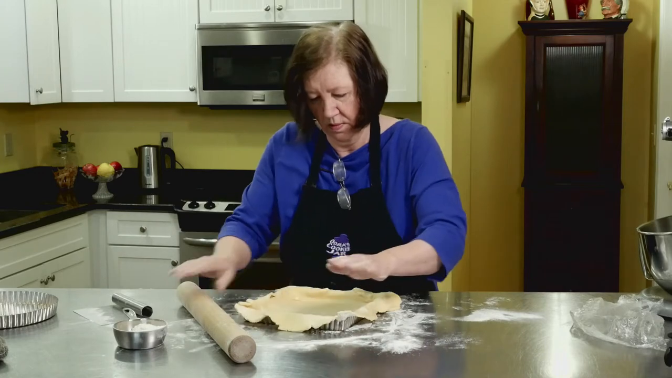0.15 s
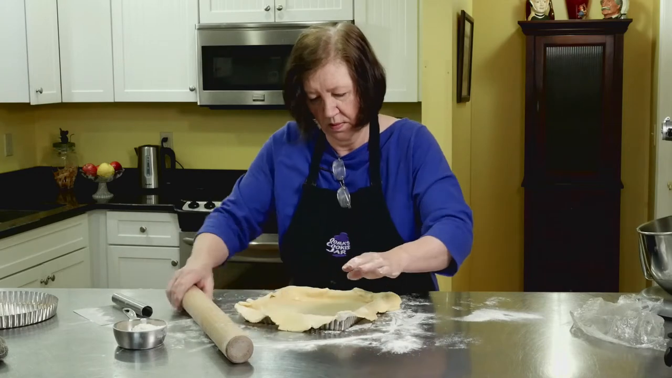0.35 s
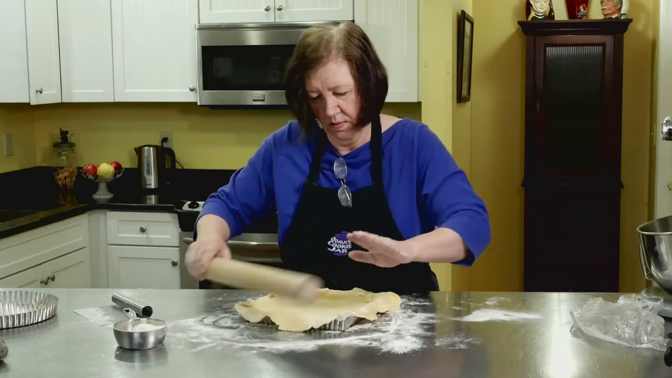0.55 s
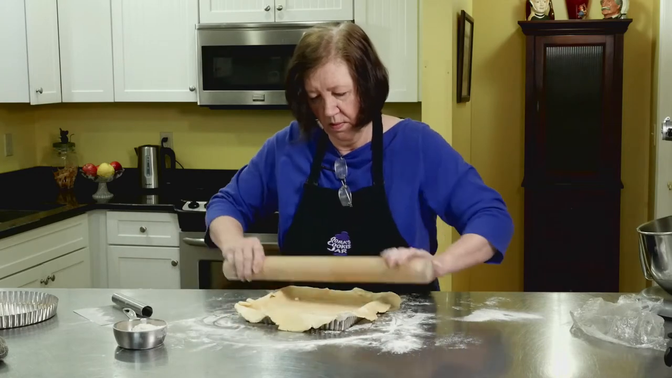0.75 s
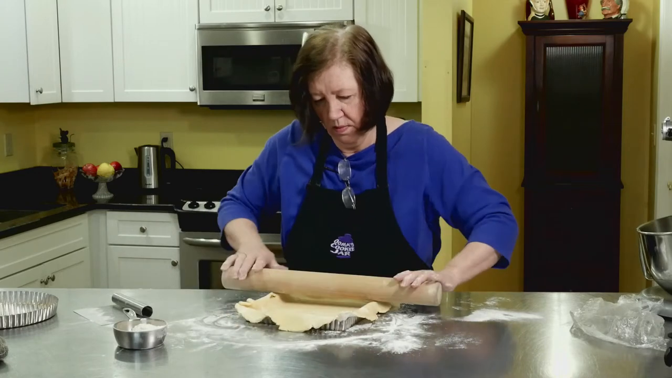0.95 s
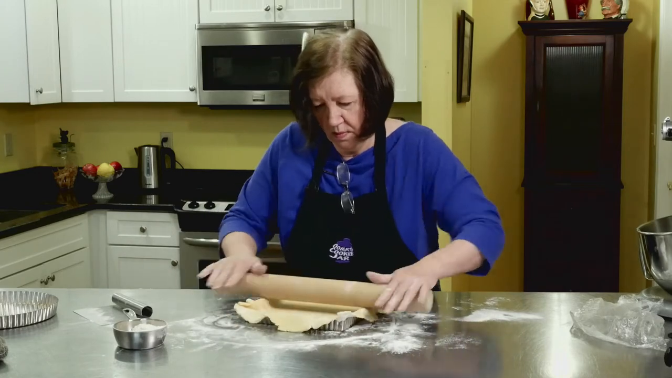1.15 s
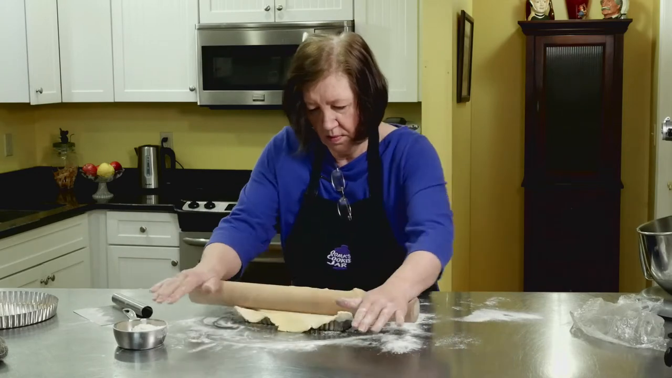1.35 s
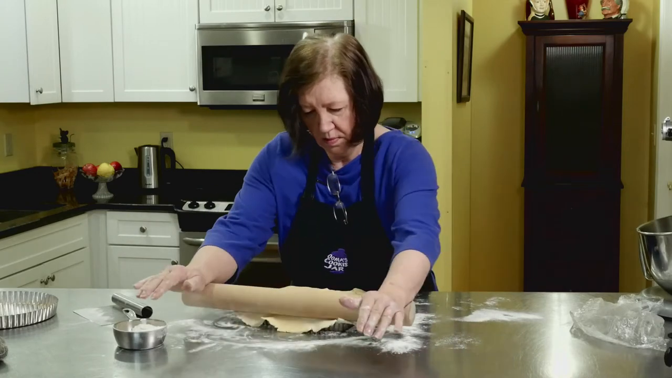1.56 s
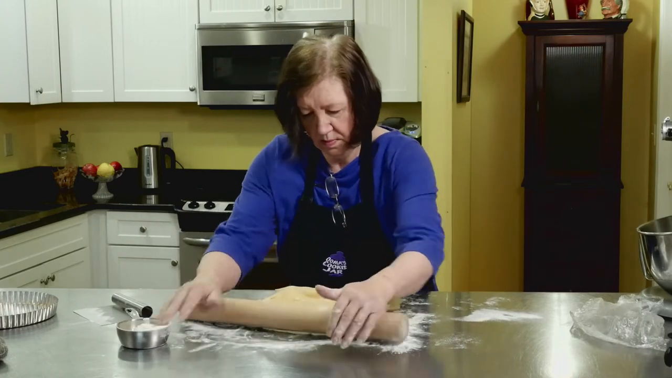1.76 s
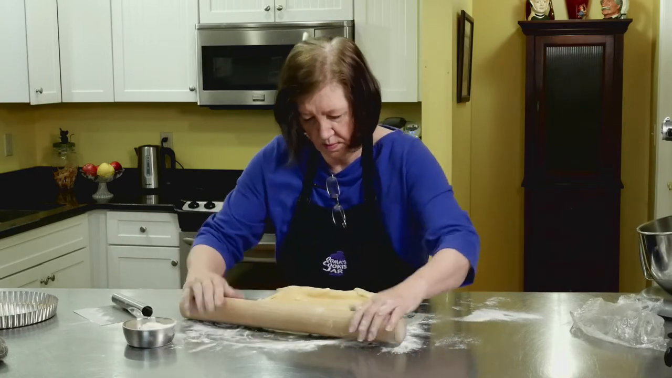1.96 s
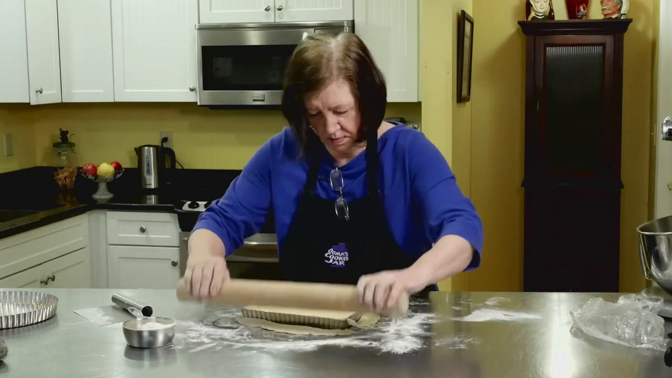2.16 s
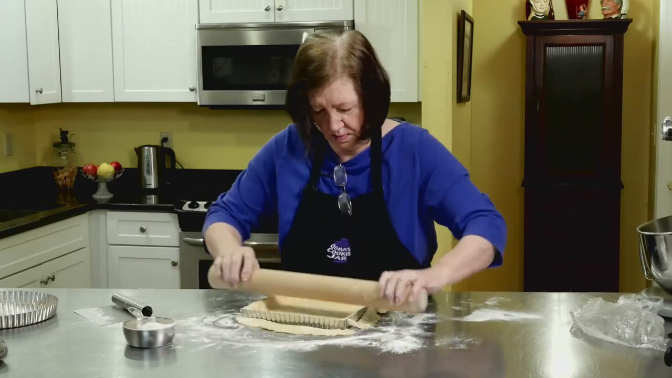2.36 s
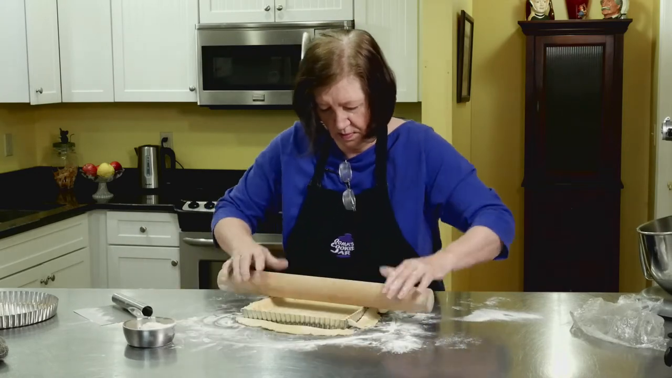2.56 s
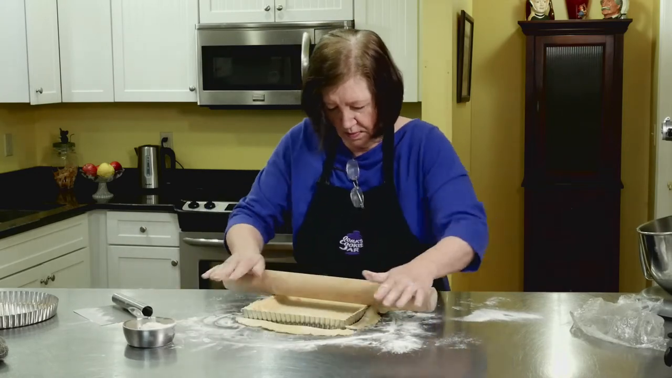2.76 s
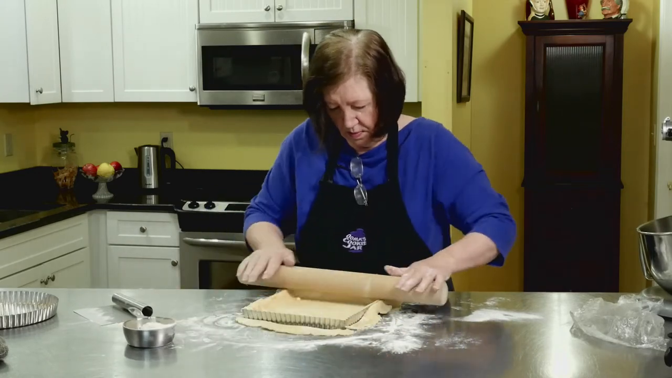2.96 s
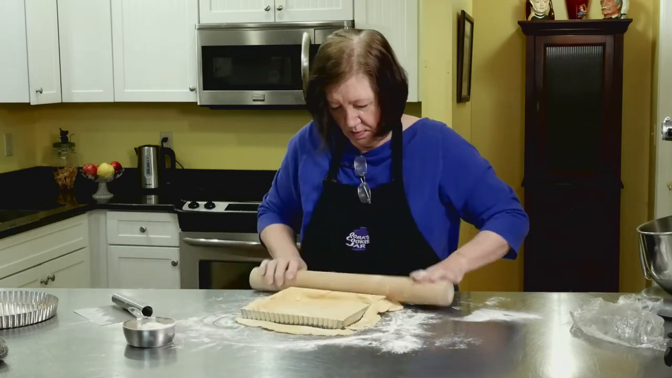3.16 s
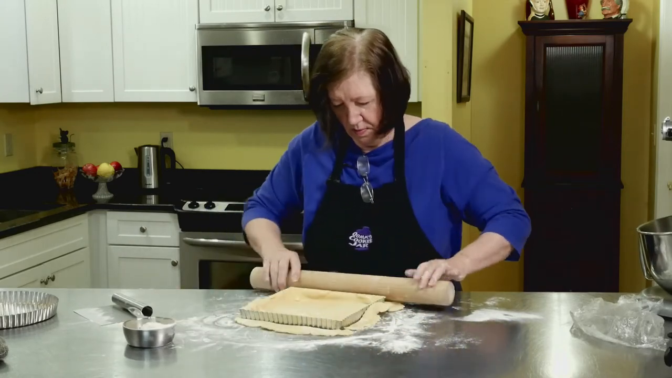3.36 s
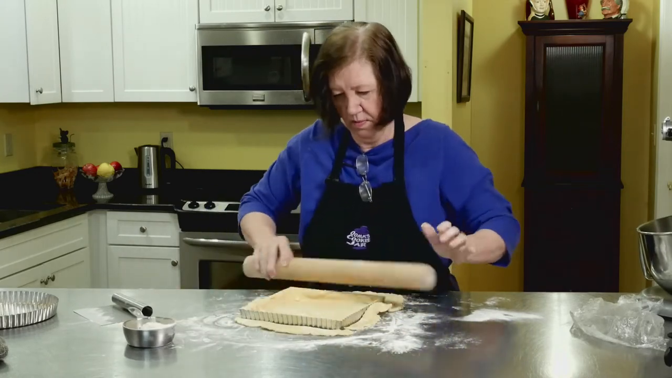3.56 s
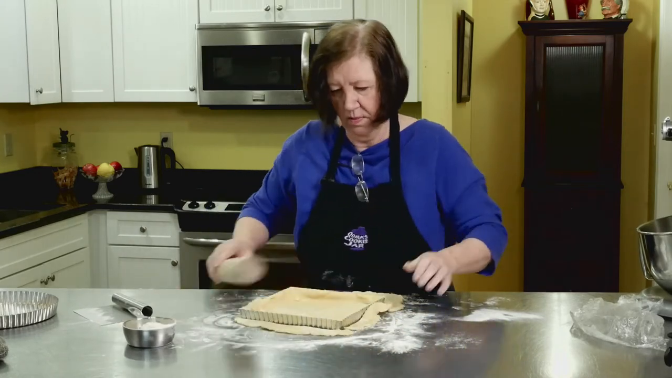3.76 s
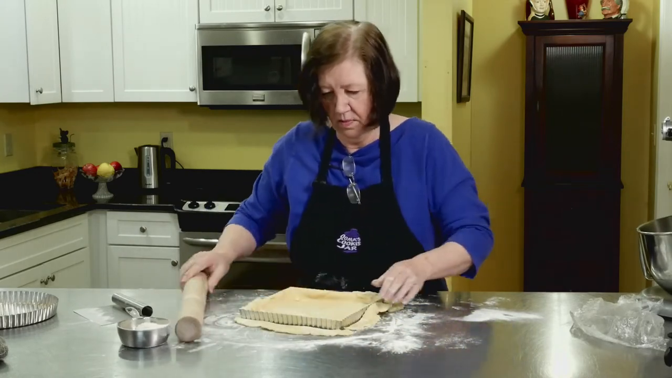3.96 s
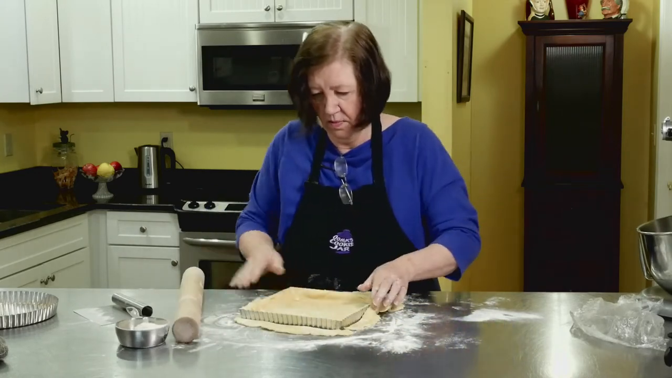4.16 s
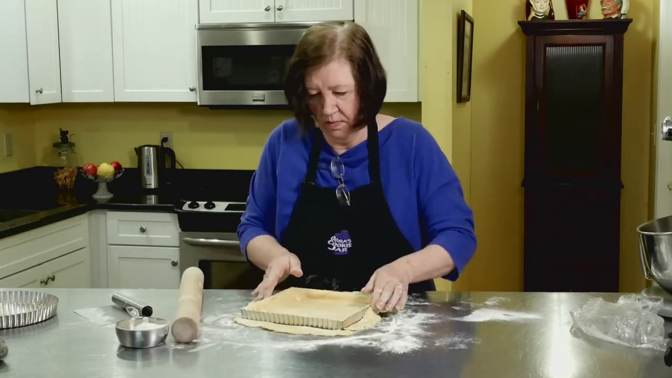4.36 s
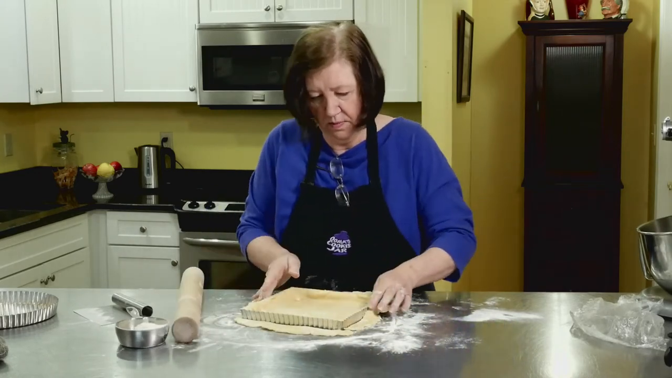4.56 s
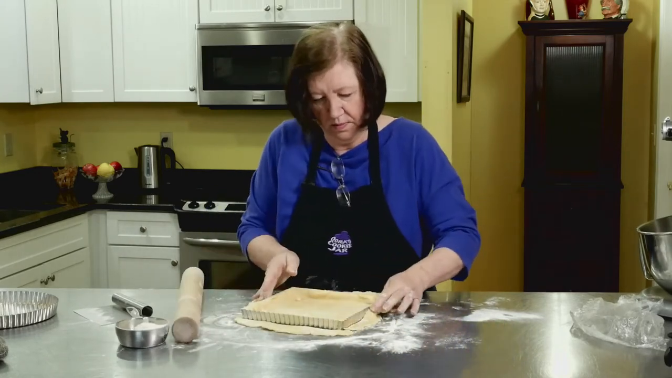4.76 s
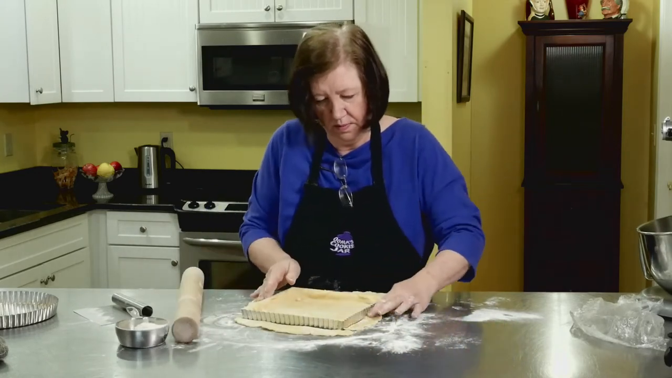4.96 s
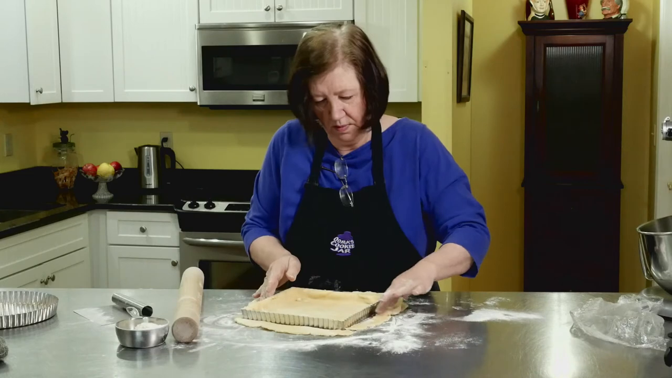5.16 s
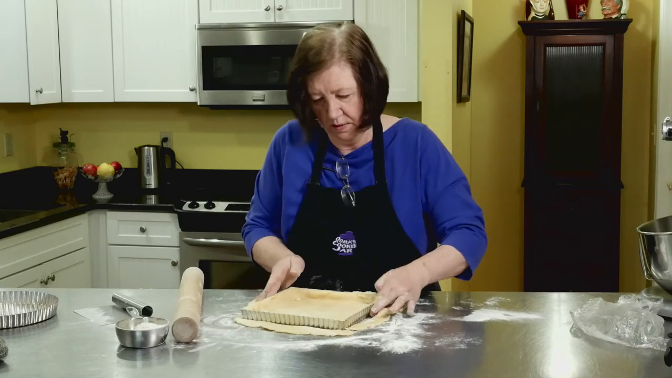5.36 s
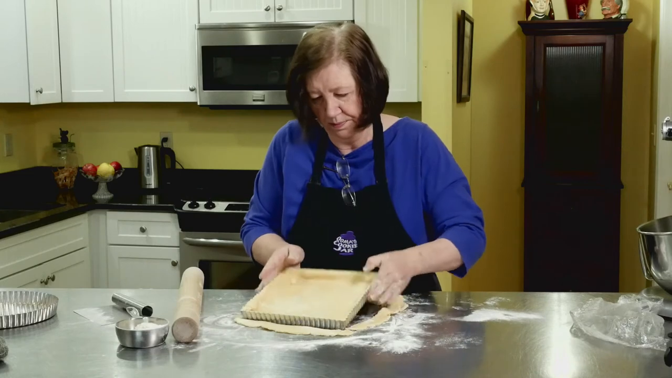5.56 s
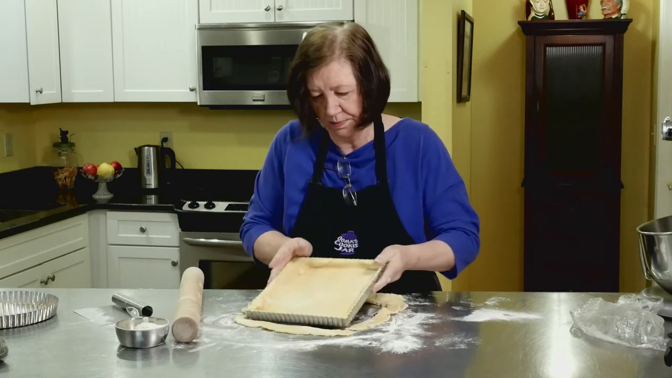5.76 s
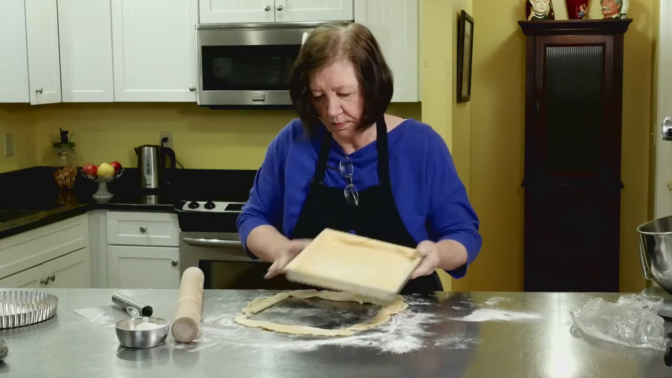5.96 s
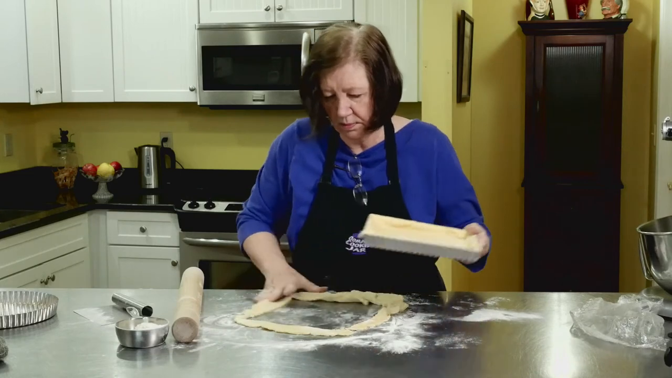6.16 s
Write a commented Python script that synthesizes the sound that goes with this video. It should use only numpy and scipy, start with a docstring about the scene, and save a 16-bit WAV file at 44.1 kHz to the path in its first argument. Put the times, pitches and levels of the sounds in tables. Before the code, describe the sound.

Heard fairly close with a muffled top end: low boomy thuds, then bright wooden knocks on metal, a burst of soft bumps as a pin rolls over a fluted rim, and more knocks with short room echo. A second, lighter roll precedes a very loud crack. After a gap and a faint footfall, the pin lands in a quick double clack. Quiet dough rubbing and a soft late bump finish over steady air noise.

```python
"""A wooden rolling pin knocks on a dough-covered tart pan on a steel counter and rolls over its fluted rim.
Knocks layer crack, thump, boom, rattle and wood ring; rolling is a train of soft bumps, grit and crackle.
The pin drops off the rim and is laid aside, ringing in decaying modes; thin pan ticks join the contacts.
Hands, pin and pan rub dough and flour: resonant clicks under hiss. A metal bowl rings after two hard knocks.
A small kitchen adds noise-built reverberation, over a steady ventilation noise and one soft footfall."""
import sys
import numpy as np
from scipy import signal
from scipy.fft import rfft, irfft
from scipy.io import wavfile

SR = 44100
rng = np.random.default_rng(int(sys.argv[2]) if len(sys.argv) > 2 else 0)


def bounce(signal):
    """Save signal as a 16-bit WAV file at the path given by the first command-line argument."""
    frames = np.transpose(np.atleast_2d(signal))
    limited = np.clip(frames, -1, 1)
    pcm = np.round(limited * 32767).astype(np.int16)
    wavfile.write(sys.argv[1], SR, pcm)


N = 273684
TIME = np.arange(N) / SR
RING = TIME[:SR // 4]  # time axis of a short ring

# steady ventilation noise: pitch_hz, density_db (per Hz, relative)
AIR_SPECTRUM = [(18, -79), (30, -62), (43, -44.5), (90, -27.5), (143, -2), (207, -4.5), (285, -3.5),
                (343, -7.5), (385, -8), (595, -10), (668, -9), (943, -15.5), (1030, -16.5), (2260, -20.5),
                (7290, -34), (9480, -40.5), (16000, -120)]
AIR_DB = -60

# strokes of hands, pin and pan over dough and flour: start_s, length_s, rub_db, resonance_hz, flour_hiss_db
STROKES = [(0, 0.048, -51, 1180, -65), (0.818, 0.02, -67, 1510, -61.5), (1.737, 0.048, -41.5, 517, -64.5),
           (2.128, 0.06, -50.5, 930, -63.5), (3.229, 0.037, -30.5, 564, -57.5),
           (4.418, 0.036, -67, 1910, -85), (4.726, .05, -66, 1670, -82), (5.374, 0.039, -60.5, 1750, -71),
           (5.464, .11, -63, 1740, -76), (5.61, 0.082, -50.5, 1375, -71), (5.736, 0.13, -65, 1420, -71.5),
           (5.847, 0.027, -61, 2150, -70)]
STROKE_ATTACK_S, STROKE_RELEASE_T60_S = 0.02, 0.21
STROKE_SAG_OCTAVES_PER_S = 8.2  # the resonance falls as a stroke slows

# the kitchen's reverberation by band: pitch_hz, level_db, t60_s
KITCHEN_BANDS = [(60, -34.5, .3), (114, 2, 1), (158, 11, 0.33), (205, 2, 0.5), (309, 5.5, 0.44),
                 (503, -4, 0.62), (910, 1, 0.62), (1800, -4, 0.66), (3980, -2, 0.56), (7460, -7, 0.21)]

# soft bumps of pin, rim and counter, cushioned by dough: start_s, level_db
BUMPS = [(.097, -41), (1.1853, -24.5), (1.2195, -25), (1.2510, -19.5), (1.2760, -18), (1.3200, -16.5),
         (1.339, -14.5), (1.3610, -16), (1.402, -13), (1.4261, -16.5), (1.7650, -23.5), (1.7914, -16.5),
         (2.205, -37), (2.766, -35), (2.8930, -26), (2.9343, -22.5), (2.9679, -21.5), (3.003, -19.5),
         (3.029, -23.5), (3.075, -25), (3.2497, -23.5), (4.0068, -37.5), (5.713, -39)]
BUMP_CONTACT_HZ, BUMP_THUMP_HZ, BUMP_T60_S = 620, 400, 0.022
BUMP_THUMP_DB, BUMP_RATTLE_DB, BUMP_BOOM_DB, BUMP_ROOM_DB = -5.5, -18.5, -19.5, -6.5

# knocks of pin and pan on the counter: start_s, level_db (crack, thump and wood together),
# contact_hz (brightness), thump_hz, thump_t60_s, thump_db, rattle_db, boom_db, room_db
KNOCKS = [(0.3633, -13, 965, 298, 0.12, -6, -15.5, -25, -13),
          (.3690, -18, 815, 194.4, 0.15, -10, -4.5, -18, -6),
          (.9405, -4, 847, 560, 0.0093, -31, -24.5, -33, -12),
          (1.0457, -17.5, 705, 496, 0.025, 2, -21, -14.5, -7.5),
          (1.8123, -3.5, 1470, 1284, 0.021, -12.5, -16, -20, -10),
          (1.8209, -15.5, 1580, 580, 0.023, -3, -25, -31.5, 2.5),
          (1.894, -20.5, 1300, 1000, .015, 7.5, -17.5, -32, -21.5),
          (2.1346, -23, 960, 430, 0.092, -5.5, -16, -20.5, -10),
          (2.5214, -7, 1126, 504, .013, -3.5, -13.5, -19, -7.5),
          (3.2757, 0.63, 2290, 521, 0.057, -9.5, -33, -46, -7.5),
          (4.0383, -4.5, 1580, 536, 0.02, -6, -19, -25, -1.5)]
# the counter's response to a sharp blow: pitch_hz, level_db
COUNTER_SPECTRUM = [(30, -69), (90, -26), (160, 3.5), (280, 1), (550, 2.5), (1000, -2.5), (1800, -2),
                    (3000, -5.5), (4200, -5), (6000, -19), (9000, -37.5)]
BOOM_HZ, BOOM_T60_S = 161.7, .09  # lowest mode of the counter top
# bending modes of the wooden pin: pitch_hz, level_db, t60_s
PIN_MODES = [(443, -6, 0.12), (942, 1.5, 0.074), (2181, 0, 0.06), (3680, -22, 0.035), (4900, -23.5, 0.039),
             (5297, -35, 0.051)]
WOOD_DB, WOOD_CONTACT_HZ = -24.5, 1520  # pin ring in a blow of this brightness; softer contacts ring less

# sharp ticks of the pan's loose base and rim: start_s, level_db (peak)
TICKS = [(0.363, -29), (1.259, -36.5), (1.4625, -38.5), (1.8205, -26.5), (2.135, -40), (2.524, -34.5),
         (2.945, -41.5), (2.98, -42), (3.011, -47), (3.117, -47.5), (3.278, -28.5), (4.042, -28.5)]
# modes of the thin pan: pitch_hz, level_db, t60_s
PAN_MODES = [(1750, 17, 0.0088), (2900, 7, 0.011), (3448, -2.5, 0.027), (4580, -4, .02),
             (5300, -8.5, 0.023), (6040, -10, .08)]

# pushes of the pin over the rim: crest_s, level_db, swell_s, ebb_s
ROLLS = [(1.006, -39.5, 0.029, 0.066), (1.395, -29, 0.1, 0.062), (1.806, -33, 0.028, 0.029),
         (3.02, -36, 0.067, 0.088)]
# tone of the rolling bumps through pan and counter: pitch_hz, level_db
ROLL_SPECTRUM = [(40, -33), (100, -13), (150, 5.5), (240, 1.5), (450, -4.5), (700, -4.5), (1200, -12),
                 (2200, -15.5), (4000, -36), (7000, -53)]

# shakes of the metal bowl: start_s, level_db
BOWL_SHAKES = [(3.278, -49), (4.04, -55)]
# modes of the metal bowl: pitch_hz, level_db, t60_s
BOWL_MODES = [(1210, 1.5, 0.85), (1665, -2.5, 1.88), (2255, -44, .8)]

# the pin's end touches down ahead of its whole length: start_s, level_db (peak)
PIN_TOUCH = (4.0263, -10)
FREE_S = .012  # free ringing before the whole length lands

CEILING = .97  # full-scale fraction where peaks are rounded
DULL_TOP_HZ, TOP_HZ = 7200, 12000


def undb(db):
    """Decibels to gain."""
    return 10 ** (np.asarray(db) / 20)


def unit(x):
    """Scale to an rms of one."""
    return x / np.sqrt(np.mean(x ** 2))


def peak(x, db):
    """Scale to a peak level."""
    return x * undb(db) / np.abs(x).max()


def fade(t, t60):
    """Exponential decay, down 60 dB after t60 seconds."""
    return np.exp(-np.log(1000) * t / t60)


def add(track, s, x):
    """Mix a sound into a track at a time."""
    i = max(int(s * SR), 0)
    track[i:i + len(x)] += x[:N - i]


def through(x, response):
    """Pass a sound through an impulse response, keeping its length."""
    return signal.fftconvolve(x, response)[:len(x)]


def colour(points, size=4096):
    """Minimum-phase impulse response of a (Hz, dB) spectrum, so its energy arrives early."""
    hz, db = np.transpose(points)
    bin_hz = np.arange(size // 2 + 1) * SR / size
    gain = undb(np.interp(np.log(bin_hz + 1), np.log(hz), db))
    cepstrum = irfft(np.log(gain))
    # folding the cepstrum forward makes the response causal
    cepstrum[1:size // 2] *= 2
    cepstrum[size // 2 + 1:] = 0
    return irfft(np.exp(rfft(cepstrum)))


def filtered(x, hz, kind, order=2):
    """Butterworth filter."""
    return signal.sosfilt(signal.butter(order, hz, kind, fs=SR, output="sos"), x)


def modes(table, t):
    """Decaying sines of a struck object."""
    return sum(undb(db) * fade(t, t60) * np.sin(2 * np.pi * hz * t) for hz, db, t60 in table)


def grains(rate, spread_db):
    """Random clicks of either sign and uneven size, at a mean rate per second."""
    happens = rng.random(N) < rate / SR
    sign = rng.choice([-1, 1], N)
    size = undb(spread_db * (2 * rng.random(N) - 1))
    return unit(happens * sign * size)


def room_air():
    """Steady ventilation noise: white noise shaped by a falling spectrum."""
    return undb(AIR_DB) * unit(through(rng.standard_normal(N), colour(AIR_SPECTRUM)))


def stroke(t, length_s):
    """Attack, hold and release of a sliding contact."""
    attack = np.clip(t / STROKE_ATTACK_S, 0, 1)
    return attack * fade(np.maximum(t - length_s, 0), STROKE_RELEASE_T60_S)


def rubbing(width_octaves=0.91):
    """Dense slips sound through a resonance that sinks during each stroke; flour hisses with them."""
    bands_hz = np.geomspace(400, 3000, 7)[:, None]
    slips = np.array([
        unit(filtered(grains(rate=1200, spread_db=8), [hz / 1.22, hz * 1.22], "band", order=3))
        for hz in bands_hz[:, 0]])
    flour = unit(filtered(rng.standard_normal(N), [1700, 6500], "band"))
    out = np.zeros(N)
    for s, length_s, db, start_hz, flour_db in STROKES:
        start = max(int(s * SR), 0)
        span = slice(start, int(s * SR) + SR // 2)
        t = TIME[span] - s
        # the moving resonance is a crossfade between fixed bands of slips
        sag_octaves = STROKE_SAG_OCTAVES_PER_S * np.minimum(t, length_s)
        octaves_off = np.log2(bands_hz / start_hz) + sag_octaves
        weights = np.exp(-.5 * (octaves_off / width_octaves) ** 2)
        rub = unit(np.sum(weights * slips[:, span], axis=0))
        add(out, s, stroke(t, length_s) * (undb(db) * rub + undb(flour_db) * flour[span]))
    return out


def kitchen(x, first_s=0.0053, build_s=0.011):
    """Diffuse reflections that build up and then fade at their own rate in each band."""
    t = TIME[:2 ** 15]
    hz, db, t60 = np.transpose(KITCHEN_BANDS)
    noise = np.exp(2j * np.pi * rng.random(len(t) // 2 + 1))  # flat spectrum, random phases
    log_hz = np.log(np.arange(len(noise)) * SR / len(t) + 1)
    onset = np.clip((t - first_s) / build_s, 0, 1)
    tail = 0
    # each share is one at its own band and zero at the others
    for share, band_db, band_t60 in zip(np.eye(len(hz)), db, t60):
        band = irfft(noise * np.interp(log_hz, np.log(hz), share))
        tail = tail + undb(band_db) * band * unit(onset * fade(t, band_t60))
    return signal.fftconvolve(x, tail)[:N]


def dispersed(x, hz, count=4):
    """Bending waves in sheet steel: all-passes let the treble arrive a little before the bass."""
    g = np.tan(np.pi * min(hz, SR / 4) / SR)
    a = (g - 1) / (g + 1)
    for _ in range(count):
        x = signal.lfilter([a, 1], [1, a], x)
    return x


def contact(x, hz, q=0.96):
    """The pin's mass on a springy contact: a slightly resonant low-pass."""
    w = 2 * np.pi * hz
    return signal.lfilter(*signal.bilinear([w ** 2], [1, w / q, w ** 2], SR), x)


def blow(db, contact_hz, thump_hz, t60, thump_db, rattle_db, boom_db, room_db,
         spread_hz=2000, rattle_t60=0.13, crack_room_db=-2, beam_hz=2200, lowest_hz=150):
    """A crack, thump and boom of the steel sheet, a short rattle and wood ring, with their own room echo."""
    # dough between pin and metal lengthens the push and dulls the crack
    crack = peak(dispersed(contact(colour(COUNTER_SPECTRUM), contact_hz), spread_hz), 0)
    rattle = unit(through(rng.standard_normal(len(RING)), crack)) * fade(RING, rattle_t60)
    crack = np.pad(crack, (0, len(RING) - len(crack)))
    thump = filtered(modes([(thump_hz, thump_db, t60)], RING), thump_hz / 3, "high", order=1)
    boom = filtered(modes([(BOOM_HZ, boom_db, BOOM_T60_S)], RING), BOOM_HZ / 1.5, "high", order=4)
    wood = contact_hz / WOOD_CONTACT_HZ * peak(modes(PIN_MODES, RING), WOOD_DB)

    gain = undb(db) / np.abs(crack + thump + wood).max()
    body = gain * (thump + wood)
    body = body + undb(db + rattle_db) * filtered(rattle, lowest_hz, "high")
    body = body + undb(db) * boom
    # the flat sheet beams its treble, so the walls receive a duller crack
    scattered = undb(crack_room_db) * gain * filtered(crack, [lowest_hz, beam_hz], "band", order=1)
    out = undb(room_db) * kitchen(scattered + body)
    add(out, 0, gain * crack + body)
    return out


def knocks_and_bumps(cushion_hz=1800):
    """Hard knocks each strike their own spot; the cushioned bumps share one dull tone."""
    hard, soft = np.zeros((2, N))
    for s, *knock in KNOCKS:
        add(hard, s, blow(*knock))
    for s, db in BUMPS:
        bump = blow(db, BUMP_CONTACT_HZ, BUMP_THUMP_HZ, BUMP_T60_S,
                    BUMP_THUMP_DB, BUMP_RATTLE_DB, BUMP_BOOM_DB, BUMP_ROOM_DB)
        add(soft, s, bump)
    return hard + filtered(soft, cushion_hz, "low")


def pan_ticks(crack_db=10, crack_t60=0.054, scatter_db=3):
    """Light metal contacts: a noise crack over the pan's modes, mixed afresh for each tick."""
    out = np.zeros(N)
    for s, db in TICKS:
        mix = [(hz, d + scatter_db * rng.standard_normal(), t60) for hz, d, t60 in PAN_MODES]
        ring = modes(mix, RING)
        crack = filtered(rng.standard_normal(len(RING)), [1500, 7000], "band") * fade(RING, crack_t60)
        add(out, s, peak(ring + undb(crack_db) * crack, db))
    return out


def swell(crest_s, rise_s, fall_s):
    """A smooth push that builds to a crest and ebbs."""
    width_s = np.where(TIME < crest_s, rise_s, fall_s)
    return np.exp(-.5 * ((TIME - crest_s) / width_s) ** 2)


def rolling(flutes_per_s=55, jitter=.25, spread_db=2, grit_db=-5, soft_hz=650,
            crackle_per_s=110, crackle_db=-29, crackle_t60=0.016):
    """The pin bumps from flute to flute over flour grit; the rim crackles as it cuts the dough."""
    pressure = sum(undb(db) * swell(s, rise_s, fall_s) for s, db, rise_s, fall_s in ROLLS)
    # one column varies the spacing of the bumps, the other their level
    chance = rng.standard_normal(size=(1200, 2))
    at = (np.cumsum(np.exp(jitter * chance[:, 0])) * SR / flutes_per_s).astype(int)
    bumps = np.zeros(N)
    bumps[at[at < N]] = undb(spread_db * chance[at < N, 1])
    grit = grains(rate=2300, spread_db=11.5)
    force = filtered(unit(bumps), soft_hz, "low") + undb(grit_db) * grit
    tick = filtered(rng.standard_normal(len(RING)), [1300, 4600], "band") * fade(RING, crackle_t60)
    crackle = unit(through(grains(rate=crackle_per_s, spread_db=0.5), tick))
    rumble = unit(through(force, colour(ROLL_SPECTRUM)))
    return pressure * (rumble + undb(crackle_db) * crackle)


def bowl():
    """A metal bowl on the counter, shaken by two hard knocks, rings faintly in long decaying modes."""
    out = np.zeros(N)
    for s, db in BOWL_SHAKES:
        add(out, s, undb(db) * modes(BOWL_MODES, TIME))
    return out


def footfall(s=3.82, width_s=0.027, db=-51, low_hz=150, high_hz=270):
    """A soft low thud of band-limited noise as the cook shifts weight."""
    thud = unit(filtered(rng.standard_normal(N), [low_hz, high_hz], "band"))
    return undb(db) * thud * np.exp(-.5 * ((TIME - s) / width_s) ** 2)


def pin_touch(damped_t60=0.021, contact_hz=5000, buzz_db=-24):
    """The pin rings like a woodblock and buzzes lightly on the steel, until the counter damps it."""
    s, db = PIN_TOUCH
    out = np.zeros(N)
    buzz = unit(filtered(rng.standard_normal(len(RING)), [300, 4000], "band")) * fade(RING, 0.12)
    damping = fade(np.maximum(RING - FREE_S, 0), damped_t60)
    ring = (modes(PIN_MODES, RING) + undb(buzz_db) * buzz) * damping
    add(out, s, peak(dispersed(filtered(ring, [250, contact_hz], "band"), 2530), db))
    return out


def scene(roll_room_db=-3, touch_room_db=-16, tick_room_db=1, rub_room_db=-5):
    """All sources, with room sends for rolling, touch, ticks and rubbing; blows bring their own room."""
    out = knocks_and_bumps() + bowl() + footfall() + room_air()
    sends = [(rolling(), roll_room_db), (pin_touch(), touch_room_db),
             (pan_ticks(), tick_room_db), (rubbing(), rub_room_db)]
    for sound, room_db in sends:
        out = out + sound + undb(room_db) * kitchen(sound)
    return out[None]


def record(dry, air_db=-11, dull_hz=7300):
    """Rounds peaks; a steep low-pass near 7 kHz dulls the sound, with a quiet top band up to 12 kHz."""
    dry = dry / (1 + np.abs(dry / CEILING) ** 12) ** (1 / 12)
    low_pass = signal.ellip(8, .2, 70, DULL_TOP_HZ, fs=SR, output="sos")
    dull = signal.sosfilt(low_pass, filtered(dry, dull_hz, "low", order=5))
    top_band = filtered(dry, 8300, "high", order=8)
    heard = dull + undb(air_db) * top_band
    return signal.sosfilt(signal.ellip(8, .2, 70, TOP_HZ, fs=SR, output="sos"), heard)


dry = scene()
out = record(dry)
bounce(out)
```